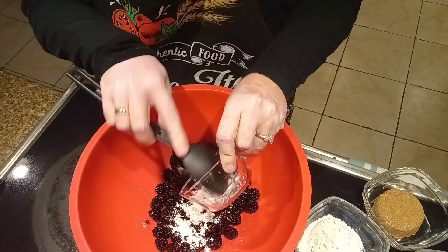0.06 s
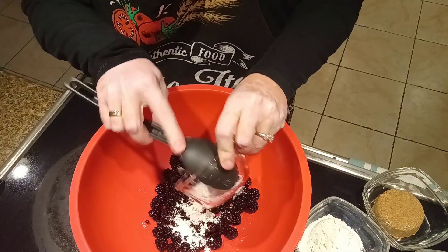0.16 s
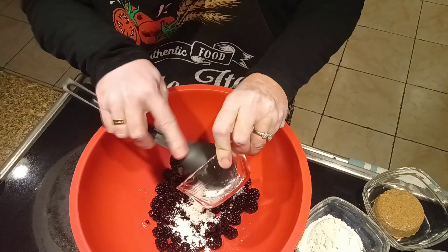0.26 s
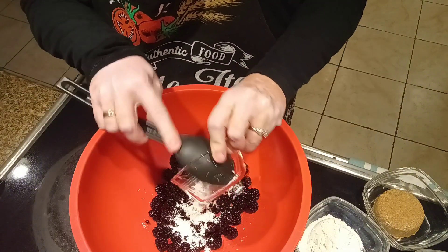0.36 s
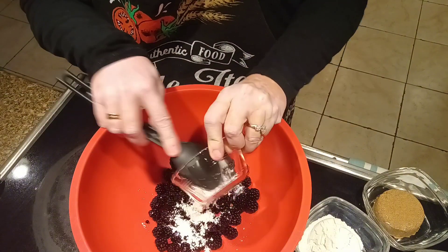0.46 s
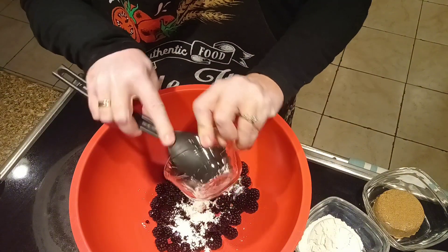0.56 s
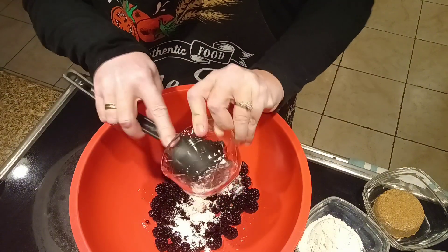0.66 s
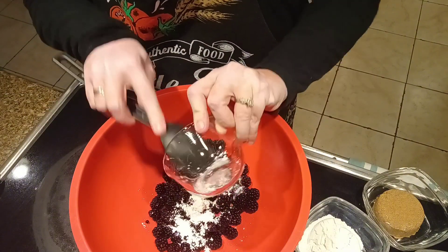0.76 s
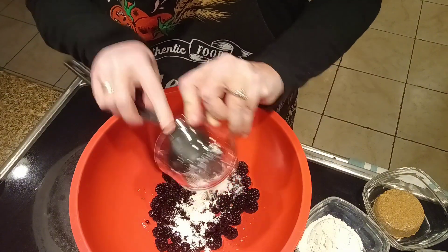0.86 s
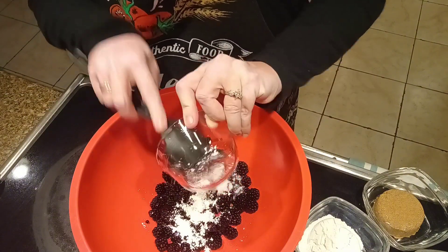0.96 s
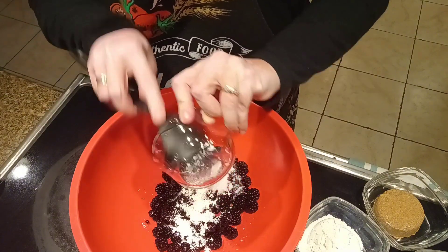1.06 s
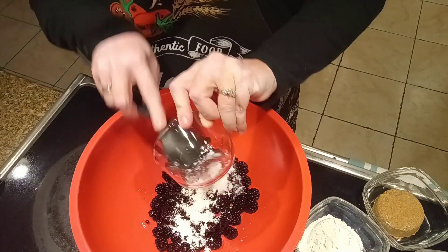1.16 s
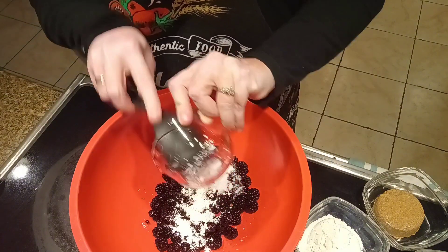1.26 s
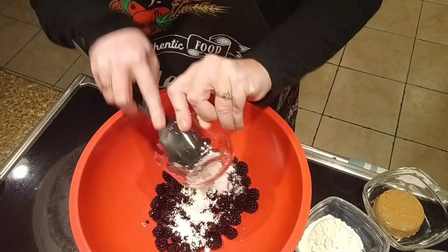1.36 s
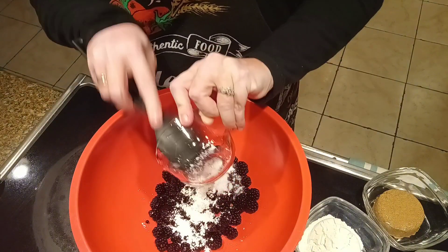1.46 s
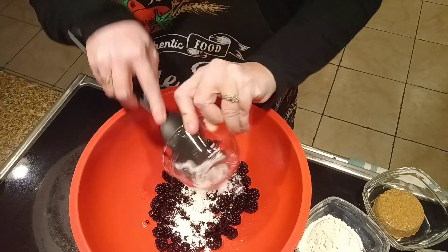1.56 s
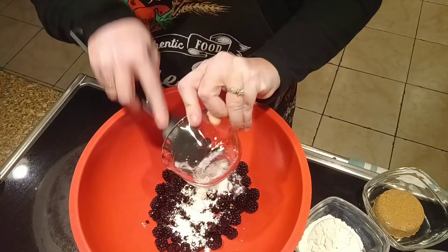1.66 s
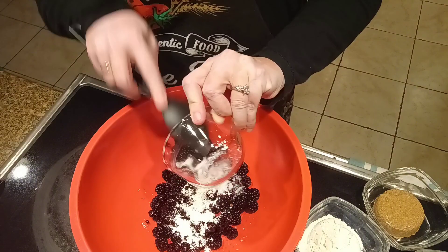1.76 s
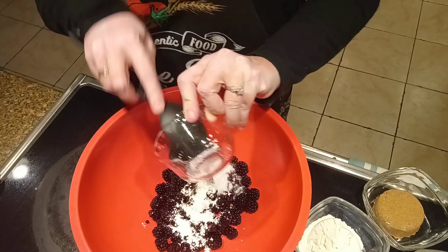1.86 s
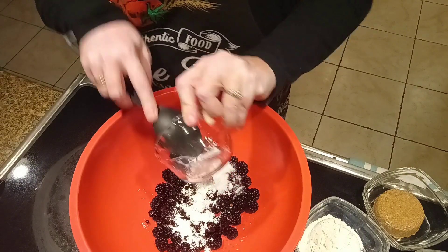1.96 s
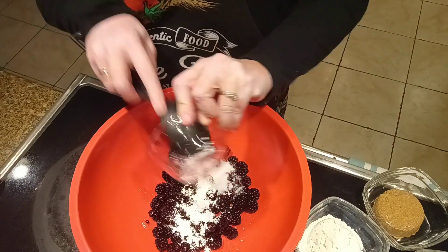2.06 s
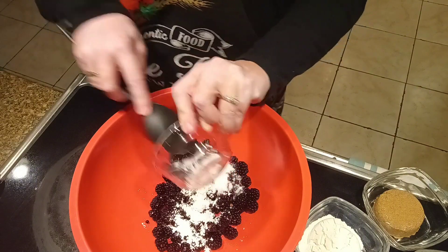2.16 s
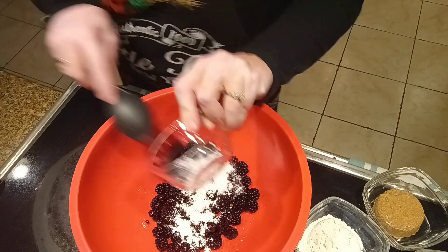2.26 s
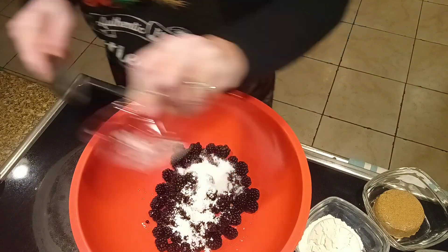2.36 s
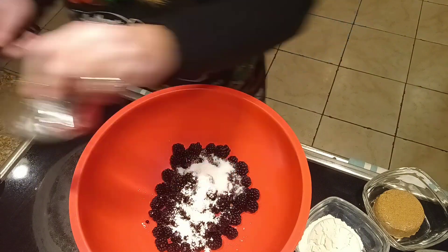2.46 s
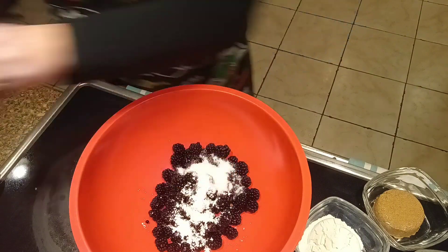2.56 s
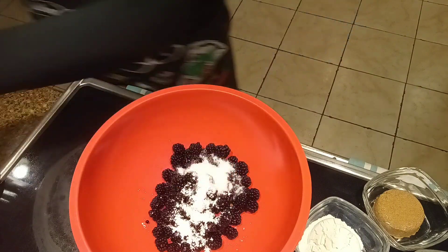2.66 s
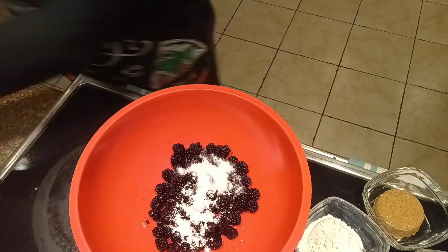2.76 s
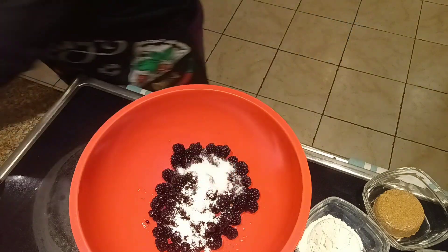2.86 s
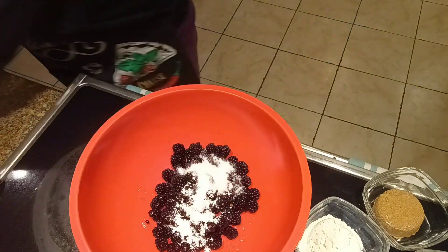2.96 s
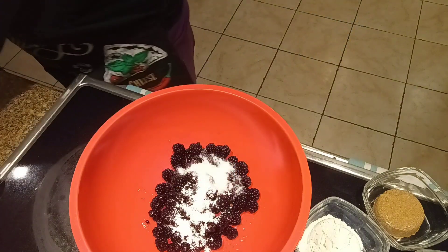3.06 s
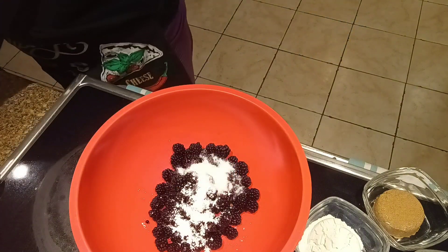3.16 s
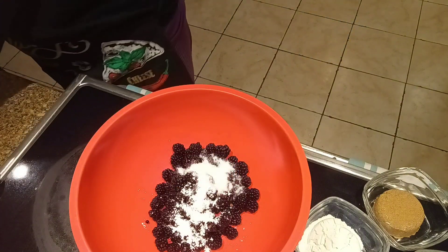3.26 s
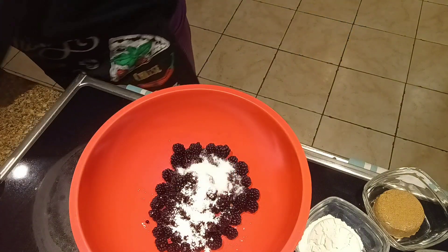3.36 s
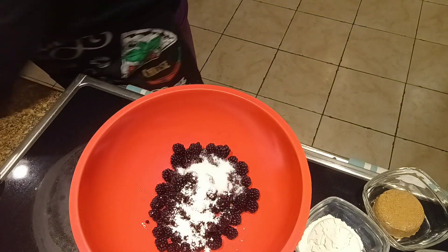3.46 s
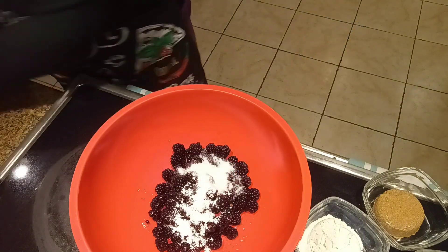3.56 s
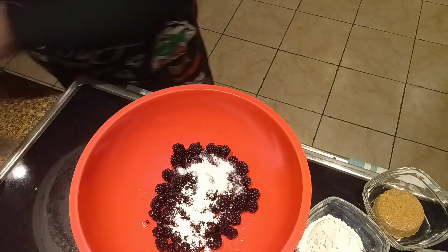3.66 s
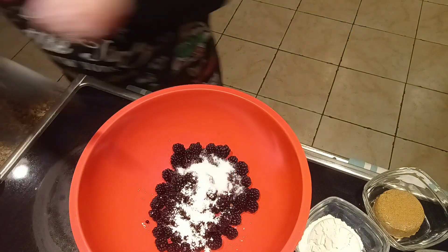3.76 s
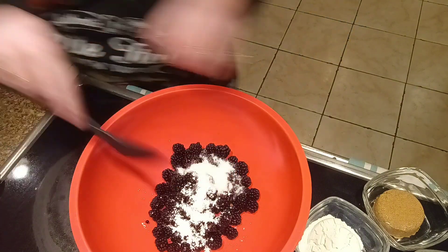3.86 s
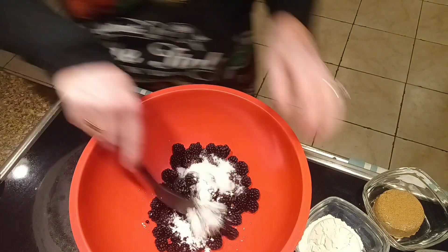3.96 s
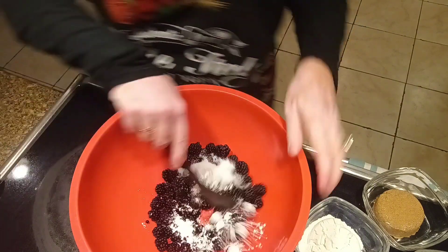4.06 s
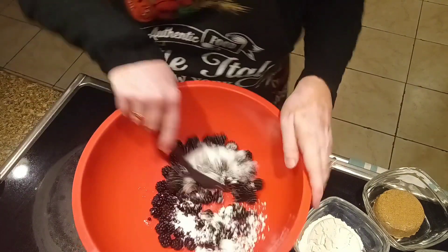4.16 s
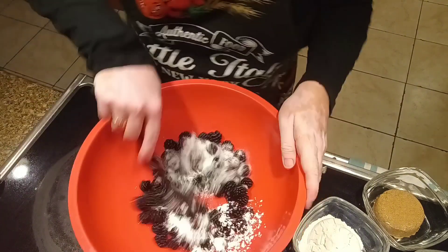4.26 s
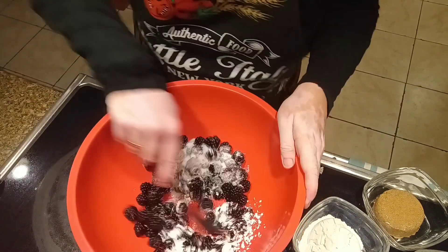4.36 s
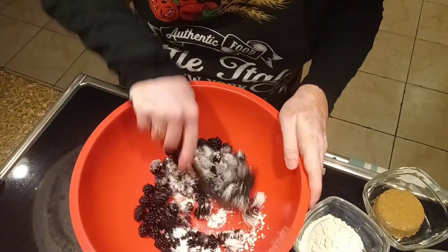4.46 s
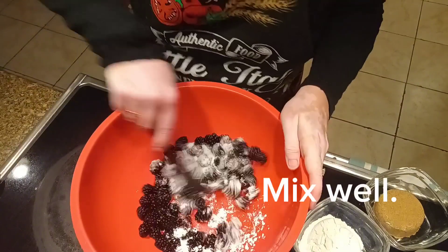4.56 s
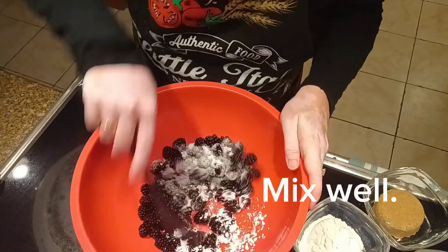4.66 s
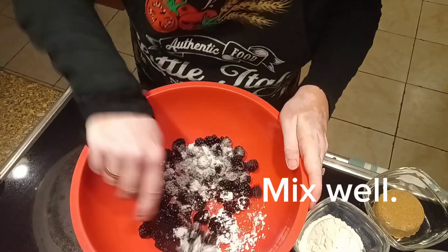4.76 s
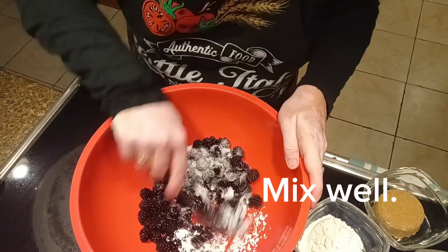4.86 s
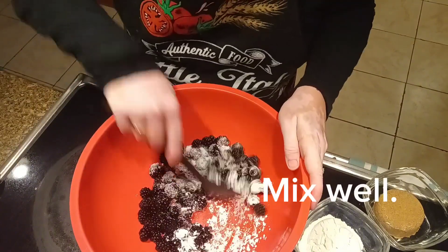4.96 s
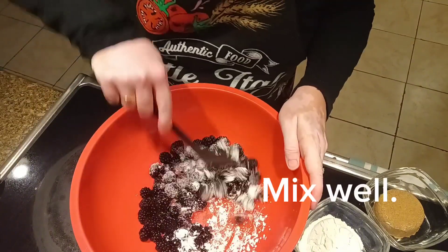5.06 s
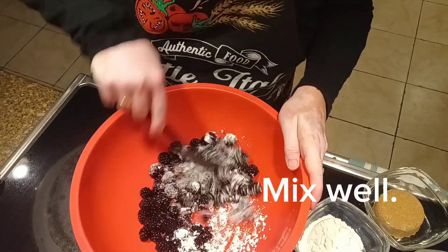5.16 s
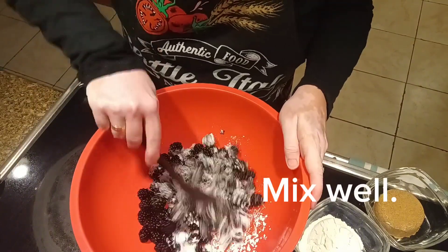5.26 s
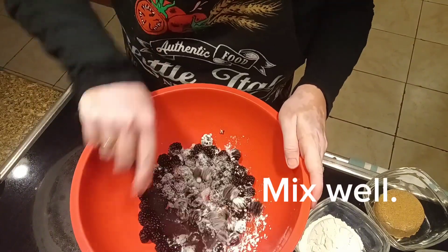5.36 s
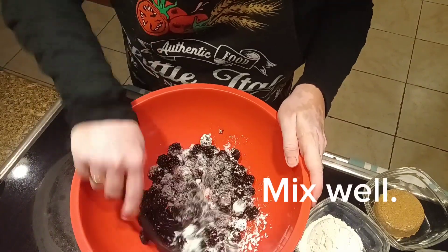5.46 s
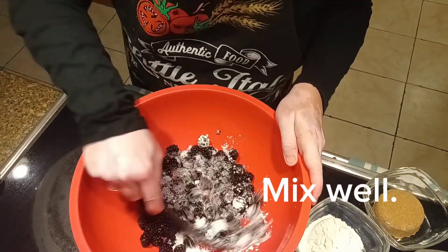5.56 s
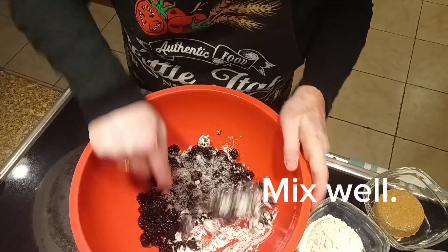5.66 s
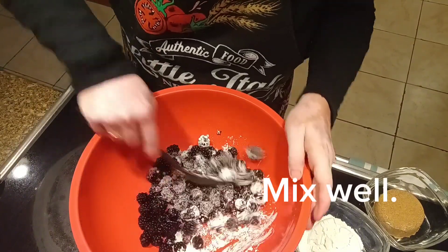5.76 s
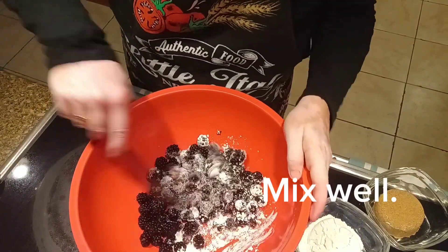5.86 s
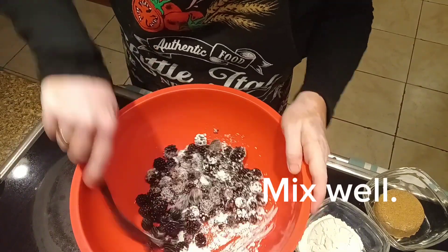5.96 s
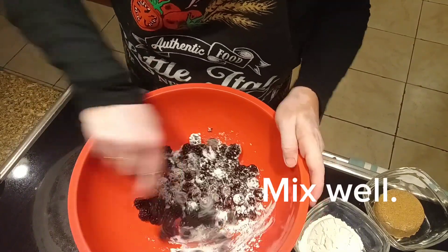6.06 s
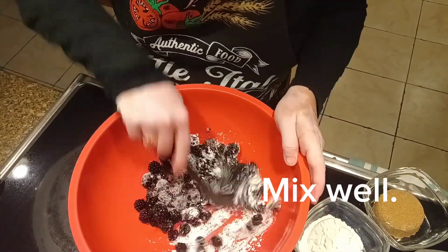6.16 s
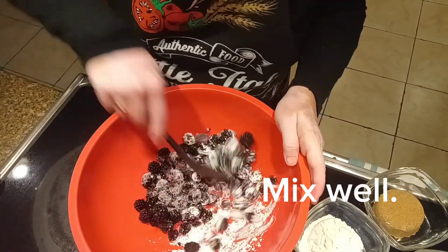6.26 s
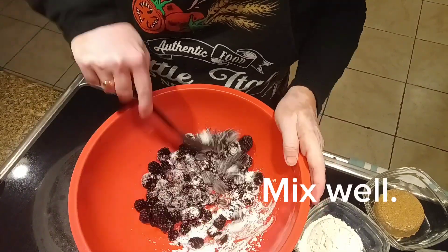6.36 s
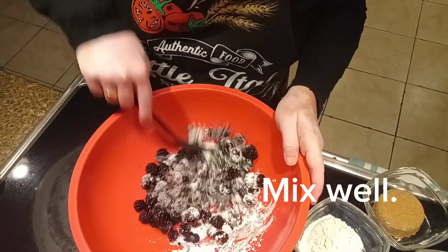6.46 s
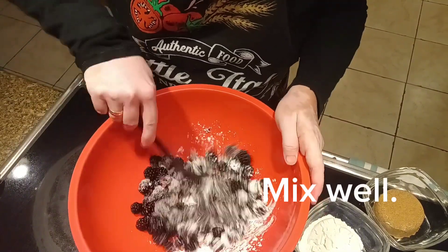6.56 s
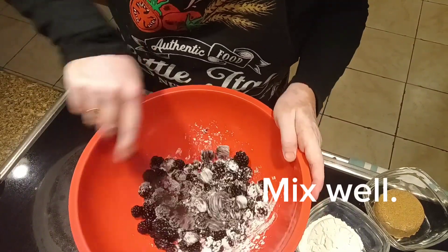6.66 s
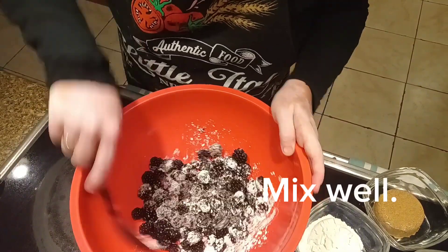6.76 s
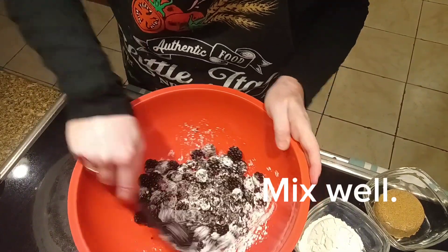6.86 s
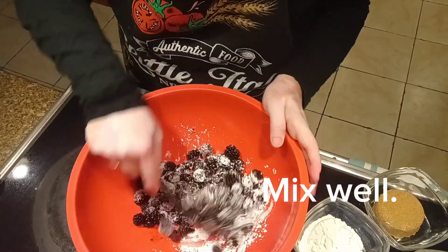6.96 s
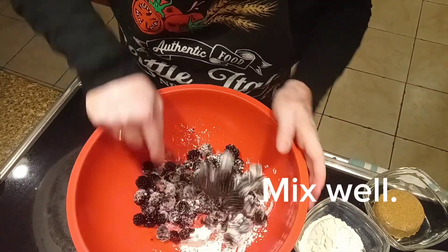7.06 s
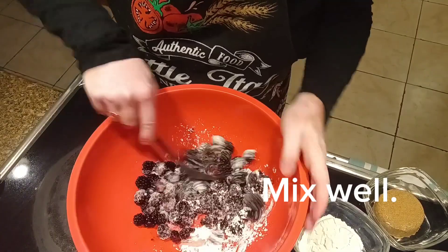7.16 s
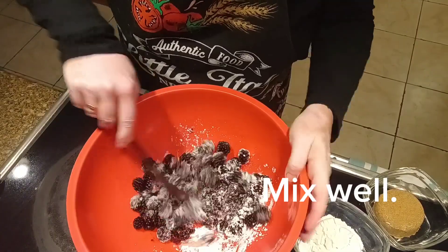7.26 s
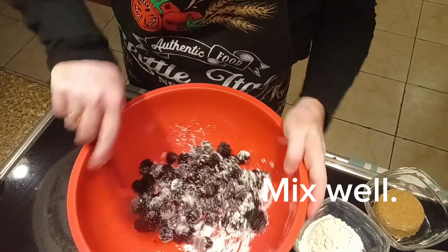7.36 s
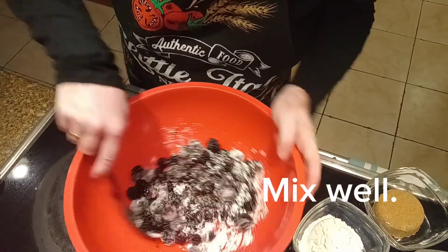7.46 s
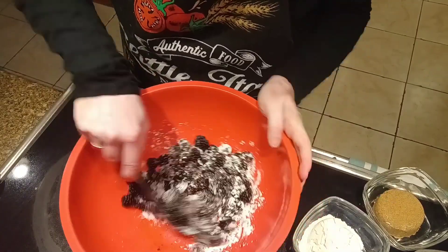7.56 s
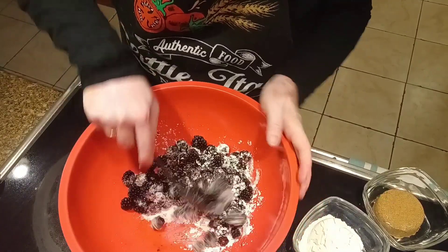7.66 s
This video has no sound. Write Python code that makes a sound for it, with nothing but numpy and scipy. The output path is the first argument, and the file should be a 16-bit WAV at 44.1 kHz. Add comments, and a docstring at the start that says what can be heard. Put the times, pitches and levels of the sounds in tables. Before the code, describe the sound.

Sharp plastic taps empty a small cup, a glassy clink and counter thud follow, then a spoon crunches through floury berries, knocking a big bowl.

```python
"""A plastic spoon scrapes and knocks flour out of a small plastic cup over a big plastic bowl of berries.
A sleeve rustles, the cup is put aside with a clink and a thud, then the spoon stirs, clacking and scraping on the bowl.
Blows are decaying modes plus a noisy crack; scrapes and berries are coloured random grains; rumble is shaped noise.
A phone above the bowl hears a tiled kitchen and an appliance hum; its limiter ducks at every hard knock."""
import sys
import numpy as np
from scipy import signal
from scipy.fft import rfft, irfft
from scipy.io import wavfile
from scipy.ndimage import uniform_filter1d, minimum_filter1d

SR = 44100
rng = np.random.default_rng(int(sys.argv[2]) if len(sys.argv) > 2 else 0)


def bounce(signal):
    """Save signal as a 16-bit WAV file at the path given by the first command-line argument."""
    frames = np.transpose(np.atleast_2d(signal))
    limited = np.clip(frames, -1, 1)
    pcm = np.round(limited * 32767).astype(np.int16)
    wavfile.write(sys.argv[1], SR, pcm)


N = 339129
T = np.arange(N) / SR
BLOW_T = T[:SR // 2]

# Contact crack of the cup, against spoon or dish. Each row: frequency in Hz, relative level in dB.
CUP_CRACK_COLOUR = [(60, -51.5), (300, -20.5), (800, -6), (1400, 3.5), (3500, 2), (5500, 2.5), (7400, 7),
                    (8500, -16), (11000, -24), (12500, -34.5), (16000, -40)]
# Gritty brightness of dragged flour and brushed cloth. Each row: frequency in Hz, relative level in dB.
GRIT_COLOUR = [(1000, -32.5), (2100, -17.5), (3000, -5), (4800, -2.5), (6800, 4), (8300, -12.5),
               (11000, -22), (15500, -33.5)]


def amp(db):
    """Decibels to gain."""
    return 10 ** (np.asarray(db) / 20)


def unit(x):
    """Scale to rms 1."""
    return x / np.sqrt(np.mean(x ** 2))


def fade(t, t60):
    """Exponential decay, 60 dB down after t60 seconds."""
    return np.exp(-np.log(1000) * t / max(t60, 1 / SR))


def shape(x, points):
    """Causal minimum-phase filter through (Hz, dB) points, made from the cepstrum of the log gain."""
    size = 4096
    hz, db = np.transpose(points)
    bin_hz = np.arange(size // 2 + 1) * SR / size
    gain_db = np.interp(np.log(bin_hz + 1), np.log(hz), db)
    cepstrum = irfft(np.log(amp(gain_db)))
    # folding the cepstrum onto positive times makes the filter causal
    cepstrum[1:size // 2] *= 2
    cepstrum[size // 2 + 1:] = 0
    impulse = irfft(np.exp(rfft(cepstrum)))
    return signal.fftconvolve(x, impulse)[:len(x)]


def walk(rate):
    """Random wander with a spread near 1: straight lines between `rate` random values a second."""
    return np.interp(T * rate, np.arange(N), rng.standard_normal(N))


def swells(rows):
    """Sum of bell-shaped envelopes from (peak s, half length s, dB) rows."""
    return sum(amp(db) * np.exp(-((T - s) / half) ** 2) for s, half, db in rows)


def grains(rate, spread_db):
    """Tiny friction slips at random moments, about `rate` a second, some stronger than the rest."""
    slipping = rng.random(N) < rate / SR
    size = rng.standard_normal(N)
    extra_db = spread_db * np.minimum(rng.exponential(size=N), 4)
    return slipping * size * amp(extra_db)


def lumpy(colour, rate, lump_db=3.0):
    """Friction whose contacts keep changing: each band of the grains swells on its own."""
    slips = grains(rate, spread_db=0.5)
    edges_hz = np.geomspace(200, 17000, 13)
    mix = np.zeros(N)
    for band_hz in zip(edges_hz, edges_hz[1:]):
        bandpass = signal.butter(2, band_hz, "band", fs=SR, output="sos")
        band = signal.sosfilt(bandpass, np.roll(slips, rng.integers(200)))
        mix += band * amp(lump_db * walk(rate=35))
    return unit(shape(mix, colour))


def strike(modes, crack_colour, crack_db, crack_t60, scatter_db):
    """One blow: the body's decaying modes with random signs and scattered levels, plus the contact's chatter."""
    ring = np.zeros(len(BLOW_T))
    for hz, db, t60 in modes:
        luck, side = rng.standard_normal(2)
        level = np.sign(side) * amp(db + scatter_db * luck)
        ring += level * fade(BLOW_T, t60) * np.sin(2 * np.pi * hz * BLOW_T)
    chatter = rng.standard_normal(len(BLOW_T)) * fade(BLOW_T, crack_t60)
    crack = shape(chatter, crack_colour)
    return unit(ring) + amp(crack_db) * unit(crack)


def contact(x, tilt_db, favoured_hz=1000, boost_db=0, octaves=.3):
    """A harder contact tilts a blow towards the treble (dB per octave); its place favours one region of modes."""
    hz = np.geomspace(900, 12000, 60)
    away = np.log2(hz / favoured_hz)  # in octaves
    gain_db = tilt_db * away + boost_db * np.exp(-(away / octaves) ** 2)
    return shape(x, np.transpose([hz, gain_db]))


def add(track, s, blow, db):
    """Mix in a blow at time s; db is the rms of its first hundredth of a second."""
    start = int(s * SR)
    first_rms = np.sqrt(np.mean(blow[:SR // 100] ** 2))
    track[start:start + len(blow)] += amp(db) * blow[:N - start] / first_rms


def background():
    """A wavering appliance hum with a thin whine, over soft air noise whose bass is alike at both ports."""
    # Partials of the hum, the last one the whine. Each row: frequency in Hz, rms level in dB.
    hum_partials = [(59.2, -70), (113, -67), (166.9, -58.5), (199.2, -74.5), (221, -58.5), (14200, -89.5)]
    # Colour of the kitchen air. Each row: frequency in Hz, relative level in dB.
    air_colour = [(20, -18), (60, -10), (170, -1.5), (280, -5.5), (600, -11.5), (1300, -18.5), (3000, -18),
                  (5000, -21), (7000, -13.5), (9000, -31.5), (13000, -41), (16000, -41.5)]
    hum = np.zeros(N)
    for hz, db in hum_partials:
        level = np.sqrt(2) * amp(db + 1.0 * walk(rate=6.2))
        phase_wander = .5 * walk(rate=8.7)  # radians
        hum += level * np.sin(2 * np.pi * hz * T + phase_wander)
    bass = signal.butter(2, 500, fs=SR)
    treble = signal.butter(2, 500, "high", fs=SR)
    shared = signal.lfilter(*bass, rng.standard_normal(N))
    air = []
    for _ in range(2):
        own = signal.lfilter(*treble, rng.standard_normal(N))
        air.append(unit(shape(shared + own, air_colour)))
    return hum + amp(-58.5) * np.array(air)


def worktop():
    """Shaped noise: the worktop rumbles as the cook moves, the bowl shifts on the hob; each shakes the other."""
    # Shifts of the bowl. Each row: peak in seconds, half length in seconds, level in dB.
    shift_rows = [(2.72, 0.052, -47.5), (3.56, 0.056, -34), (4.18, 0.051, -36), (4.42, 0.021, -41),
                  (4.54, 0.1, -52), (5.58, 0.069, -45), (5.91, 0.045, -37), (6.2, .035, -56),
                  (6.55, 0.027, -37), (6.79, 0.028, -65), (7.03, 0.028, -43), (7.335, 0.053, -37)]
    # Colour of the bowl's shifting. Each row: frequency in Hz, relative level in dB.
    shift_colour = [(25, -29), (60, 11), (100, -4), (145, 14), (200, 1.5), (280, -16), (700, -25.5),
                    (2000, -53.5), (10000, -81.5)]
    # Colour of the worktop's rumble. Each row: frequency in Hz, relative level in dB.
    rumble_colour = [(30, -21), (58, 6), (85, -2), (120, -1.5), (250, -44.5), (4000, -74.5)]
    # almost still while the cup is emptied, then rumbling once the cook moves about
    still_db, moving_db, wander_db = -71, -53.5, 3.5
    moving_from_s, moving_until_s, moving_fade_s = 2.75, 6.83, 0.39
    shift_rumble_db, bowl_tremble_db = -16.5, 1.5  # how much each shakes the other
    inside_s = np.minimum(T - moving_from_s, moving_until_s - T)
    moving = np.clip(1 + inside_s / moving_fade_s, 0, 1)
    sway = (amp(still_db) + amp(moving_db) * moving) * amp(wander_db * walk(rate=8))
    shifts = swells(shift_rows)
    rumble = unit(shape(rng.standard_normal(N), rumble_colour))
    scuff = unit(shape(rng.standard_normal(N), shift_colour))
    leaning = rumble * (sway + amp(shift_rumble_db) * shifts)
    shifting = scuff * (shifts + amp(bowl_tremble_db) * sway)
    return leaning + shifting


def cup():
    """The spoon wipes the cup in coloured grains and knocks the flour loose, ringing the cup's modes."""
    # Wipes inside the cup. Each row: peak in seconds, half length in seconds, level in dB.
    wipes = [(.02, 0.022, -29.5), (.085, 0.0084, -48), (.178, 0.017, -34.5), (.352, 0.013, -31.5),
             (.475, 0.029, -31), (.735, 0.024, -39)]
    # Colour of the wiping. Each row: frequency in Hz, relative level in dB.
    wipe_colour = [(150, -37), (500, -9), (1000, 1), (1320, 15), (1800, 2.5), (4000, -1), (7400, 7),
                   (8800, -13), (11000, -7.5), (12500, -35.5), (16000, -37)]
    # Knocks on the cup. Each row: start in seconds, level in dB, frequency in Hz favoured by the
    # contact point, its boost in dB, treble tilt in dB per octave.
    taps = [(0.119, -26, 6000, 7, 2.5), (0.1323, -14.5, 1307, 19.5, -11), (0.307, -26.5, 1250, 21.5, -8.5),
            (0.348, -27, 1250, 30, -1.5), (0.374, -10.5, 2360, 12, -2.5), (.545, -6, 2340, 6.5, -1.5),
            (0.68, -22, 1320, 18.5, 3), (0.7618, -1, 2420, 9, -3), (0.9988, -0.5, 2443, 17, -1.5),
            (1.156, -12.5, 7400, -0.5, 7.5), (1.194, -22.5, 1360, 16, -4), (1.22, -22.5, 1270, -4, -9),
            (1.369, -10.5, 6260, 7, 5), (1.418, -19, 2480, 10, -5.5), (1.563, -12, 6140, 6, 5),
            (1.605, 1.5, 1450, 1, -3), (2.028, 2, 4420, 3.5, -1), (2.205, 0.5, 4540, 8.5, -0.5),
            (3.071, -34.5, 6270, 23, 9.5)]
    # Modes of the cup. Each row: frequency in Hz, relative level in dB, t60 in seconds.
    cup_modes = [(926, -10.5, 0.042), (1343, -4, 0.027), (1340, -5.5, 0.05), (1950, -1.5, 0.089),
                 (2354, 6.5, 0.065), (2380, -18, 0.17), (2660, 10, 0.043), (2722, 9, 0.03),
                 (3080, -15, 0.076), (3300, -20.5, .09), (4510, -10, 0.28), (4400, -14.5, 0.43),
                 (5040, -20, 0.37), (6490, -21, 0.067), (7430, -12.5, 0.12)]
    out = unit(shape(grains(rate=3300, spread_db=2.5), wipe_colour)) * swells(wipes)
    for s, db, hz, boost_db, tilt_db in taps:
        blow = strike(cup_modes, CUP_CRACK_COLOUR, crack_db=7.5, crack_t60=0.028, scatter_db=1.4)
        add(out, s, contact(blow, tilt_db, hz, boost_db, octaves=.25), db)
    return out


def sleeve():
    """A sleeve brushes the apron: swelling noise with a gritty colour."""
    # Brushes of the sleeve. Each row: peak in seconds, half length in seconds, level in dB.
    rustles = [(2.76, 0.089, -61), (2.92, 0.033, -57.5), (3.2, 0.175, -66)]
    return unit(shape(rng.standard_normal(N), GRIT_COLOUR)) * swells(rustles)


def dishes():
    """The cup clinks against a glass dish and lands on the counter; each rings its own modes."""
    # Touches on the dish. Each row: start in seconds, level in dB.
    clinks = [(3.312, 1.5), (3.3235, -1.5)]
    # Modes of the glass dish. Each row: frequency in Hz, relative level in dB, t60 in seconds.
    dish_modes = [(1529, -27, 0.5), (1984, -24.5, 0.22), (2412, -29, 0.2), (3612, -7.5, .45),
                  (4436, -17.5, 0.34), (6250, 3.5, 0.069), (7530, 3, 0.095), (9400, -20.5, .17),
                  (11180, -31.5, 0.081)]
    # Landings on the counter. Each row: start in seconds, level in dB, treble tilt in dB per octave.
    thuds = [(3.465, -32.5, -11), (3.534, -15.5, 3.5), (3.557, -20.5, -2), (3.686, -31.5, 0),
             (3.707, -32.5, -4.5)]
    # Modes of the counter. Each row: frequency in Hz, relative level in dB, t60 in seconds.
    counter_modes = [(132, 1, 0.076), (173.6, 5, 0.14), (200, -4, 0.076), (320, -11, 0.16),
                     (361.4, 0.5, 0.2), (432, -15, .07), (820, -11, 0.14), (1334, -5.5, 0.094),
                     (1550, -1, 0.074), (1895, 6, 0.092), (1960, -7, 0.22), (2270, -8, 0.079)]
    # Contact crack on the counter. Each row: frequency in Hz, relative level in dB.
    counter_crack = [(60, -23), (170, -7), (500, 9.5), (1200, -0.5), (2200, 1.5), (4000, 2.5), (7000, -2.5),
                     (9000, -28.5), (16000, -81)]
    out = np.zeros(N)
    for s, db in clinks:
        blow = strike(dish_modes, CUP_CRACK_COLOUR, crack_db=-12.5, crack_t60=0.089, scatter_db=0.2)
        add(out, s, blow, db)
    for s, db, tilt_db in thuds:
        blow = strike(counter_modes, counter_crack, crack_db=-7.0, crack_t60=0.097, scatter_db=4.0)
        add(out, s, contact(blow, tilt_db), db)
    return out


def spoon_on_bowl():
    """The spoon knocks or briefly scrapes the bowl, ringing its modes, then rubs along the wall in lumpy grains."""
    # Knocks and short scrapes of the spoon on the bowl. Each row: start in seconds, level in dB, treble
    # tilt in dB per octave, frequency in Hz favoured by the contact point, chatter t60 in seconds
    # (a long chatter is more of a scrape).
    bowl_contacts = [(4.05, -36.5, -1.5, 5470, 0.019), (4.152, -27.5, 4, 6400, 0.14),
                     (4.196, -24.5, -10, 1100, 0.014), (4.23, -16, -1, 6460, 0.0026),
                     (4.304, -17.5, 4.5, 6550, 0.0022), (4.358, -17, 10.5, 6700, 0.014),
                     (4.486, -16.5, -3.5, 6150, 0.008), (4.559, -26.5, 9, 6440, 0.009),
                     (4.71, -31, 4, 3520, 0.11), (4.847, -2.5, -1.5, 5800, 0.01),
                     (5.538, -11.5, -6.5, 1890, 0.015), (6.077, -13.5, -0.5, 4960, 0.14),
                     (6.111, -13, -2.5, 5430, 0.0051), (6.512, -30, 1.5, 2980, 0.34),
                     (6.551, -10.5, 0, 3360, 0.01), (6.869, -1, 0, 4540, 0.1),
                     (7.5135, -4.5, -0.5, 3320, 0.049), (7.533, -7.5, 7.5, 5960, 0.0061),
                     (7.574, -11, 0.5, 2450, 0.0073)]
    # Modes of the bowl. Each row: frequency in Hz, relative level in dB, t60 in seconds.
    bowl_modes = [(516, -18.5, 0.13), (1130, -36, 0.018), (1920, -23, 0.033), (2750, 30, 0.048),
                  (2770, 13, 0.014), (3700, -22, 0.017), (3760, 29, 0.064), (5620, 11, 0.21),
                  (7350, -15.5, 0.011), (7380, -44, 0.0067)]
    # Contact crack on the bowl. Each row: frequency in Hz, relative level in dB.
    bowl_crack = [(60, -23), (300, -32), (550, -12), (800, -26.5), (2000, -21), (3200, -3.5), (5000, -7),
                  (7000, 0.5), (8500, -14.5), (11000, -23), (16000, -34.5)]
    # Hollow colour of the rubbed wall. Each row: frequency in Hz, relative level in dB.
    wall_colour = [(280, -41), (430, 4.5), (560, 2), (780, -17), (1100, -8.5), (2000, -43)]
    firm_db, rub_db = -9.5, -51  # contacts softer than firm_db press less
    rub_delay_s, rub_half_s = 0.051, 0.11
    out, rubbing = np.zeros((2, N))
    for s, db, tilt_db, hz, t60 in bowl_contacts:
        blow = strike(bowl_modes, bowl_crack, crack_db=14, crack_t60=t60, scatter_db=0.0)
        add(out, s, contact(blow, tilt_db, hz, boost_db=5.0, octaves=0.31), db)
        rub = swells([(s + rub_delay_s, rub_half_s, rub_db + min(db - firm_db, 0))])
        rubbing = np.maximum(rubbing, rub * (T > s))
    return out + lumpy(wall_colour, rate=870) * rubbing


def push(s, swell_s):
    """Pressure of one push: it builds up to time s and eases off a little faster."""
    ease_share = 0.7  # time to die away, as a share of the time to swell
    curve = 1.36  # 1 gives a pointed swell, 2 a round one
    away = np.where(T < s, s - T, (T - s) / ease_share) / swell_s
    return np.exp(-away ** curve)


def berries():
    """The spoon drags floury berries over the bowl in uneven slips: bright gritty grains and a soft mush."""
    # Pushes through the fruit. Each row: hardest moment in seconds, swell in seconds,
    # level of the gritty hiss in dB, level of the soft mush in dB.
    pushes = [(4.19, 0.015, -33, -40), (4.375, 0.12, -20.5, -29), (4.628, 0.051, -27, -45),
              (4.931, 0.098, -43, -49.5), (5.024, 0.034, -33.5, -48), (5.149, 0.011, -42, -75),
              (5.307, 0.069, -23.5, -46.5), (5.643, 0.072, -34, -57), (5.908, 0.067, -38, -60),
              (6.19, 0.08, -40, -42.5), (6.32, 0.032, -29.5, -52), (6.643, 0.064, -25, -39),
              (6.99, 0.059, -31, -57), (7.333, 0.084, -40.5, -53), (7.492, 0.033, -40.5, -39.5),
              (7.67, 0.037, -33.5, -33.5)]
    # Colour of the soft fruit. Each row: frequency in Hz, relative level in dB.
    mush_colour = [(300, -28), (700, -12.5), (1100, -2), (1500, -4), (2300, 0), (3200, 6), (6000, -25)]
    gritty, mushy = np.zeros((2, N))
    for s, swell_s, grit_db, mush_db in pushes:
        pressure = push(s, swell_s)
        gritty += amp(grit_db) * pressure
        mushy += amp(mush_db) * pressure
    slips = amp(0.9 * walk(rate=57))
    grit = lumpy(GRIT_COLOUR, rate=3900) * gritty * slips
    mush = lumpy(mush_colour, rate=1400) * mushy * slips
    return grit + mush


def kitchen(x, lag_s, near_db, room_db, t60=0.36, treble_t60=0.3):
    """Direct sound reaches the right port first; bowl and worktop reflect at once, the tiled room rings on."""
    t, ears = T[:SR], []
    lowpass = signal.butter(1, 5000, fs=SR)
    highpass = signal.butter(1, 5000, "high", fs=SR)
    # the source keeps moving, so it drifts between three patterns of near reflections
    places = np.array([walk(rate=12) for _ in range(3)])
    places /= np.linalg.norm(places, axis=0)
    early_t = t[:SR // 20]
    for lag in (lag_s, 0):  # left, right
        low, high = rng.standard_normal((2, SR))
        low_tail = signal.lfilter(*lowpass, low) * fade(t, t60)
        high_tail = signal.lfilter(*highpass, high) * fade(t, treble_t60)
        # the walls answer after the first few metres
        tail = (low_tail + high_tail) * (1 - fade(t, t60=0.088))
        heard = x + amp(room_db) * signal.fftconvolve(x, tail / np.linalg.norm(tail))[:N]
        for place in places:
            near = rng.standard_normal(len(early_t)) * fade(early_t, t60=0.025) * (early_t > .0007)
            heard += amp(near_db) * signal.oaconvolve(x * place, near / np.linalg.norm(near))[:N]
        ears.append(np.pad(heard, (int(abs(lag) * SR), 0))[:N])
    return np.array(ears)


def scene():
    """Cup and bowl lie just under the phone; dishes are further off and wetter; rumble reaches both ports alike."""
    emptying = kitchen(cup(), lag_s=.001, near_db=-2.5, room_db=-10)
    putting_aside = kitchen(dishes(), lag_s=0.00091, near_db=-1.5, room_db=-5.5)
    stirring = kitchen(sleeve() + spoon_on_bowl() + berries(), lag_s=.00093, near_db=1.0, room_db=-7.5)
    return emptying + putting_aside + stirring + worktop() + background()


def limiter(x, ceiling_db, release_db_per_s, ahead_s):
    """The gain slides down just ahead of each peak and climbs back at a steady rate in dB."""
    half = int(ahead_s * SR / 2)
    peak_db = 20 * np.log10(np.abs(x).max(axis=0) + 1e-9)
    allowed_db = np.minimum(ceiling_db - peak_db, 0)
    held_db = minimum_filter1d(allowed_db, 2 * half + 1, origin=-half)  # looks ahead
    climb_db = release_db_per_s * T
    gain_db = np.minimum.accumulate(held_db - climb_db) + climb_db
    return x * amp(uniform_filter1d(gain_db, half, origin=(half - 1) // 2))


def record(dry):
    """The right port is weaker but brighter; deep bass is rolled off; a limiter holds the knocks; the top is cut."""
    # Right port against left. Each row: frequency in Hz, gain in dB.
    right_colour = [(60, -6.5), (400, -10), (1300, -6.5), (2400, -5.5), (4400, -9.5), (7300, -13.5),
                    (8600, 4.5), (10000, 6.5), (15000, 2.5)]
    ports = np.array([dry[0], shape(dry[1], right_colour)])
    bass_cut = signal.butter(3, 48, "high", fs=SR, output="sos")
    ports = signal.sosfilt(bass_cut, ports)
    held = limiter(ports, ceiling_db=-1, release_db_per_s=130.0, ahead_s=0.025)
    top_cut = signal.ellip(8, .2, 70, 16000, fs=SR, output="sos")
    return signal.sosfilt(top_cut, held)


dry = scene()
out = record(dry)
bounce(out)
```